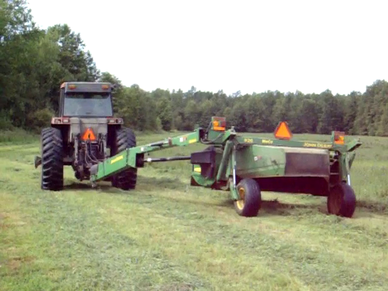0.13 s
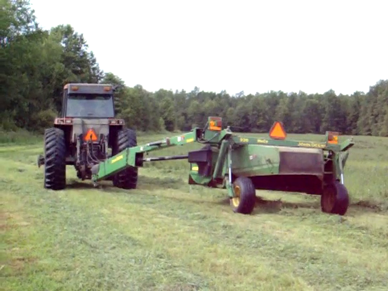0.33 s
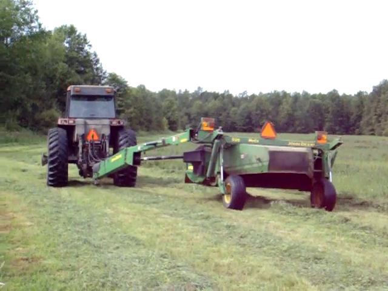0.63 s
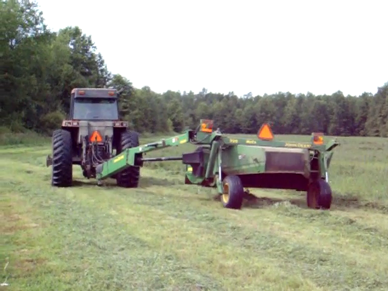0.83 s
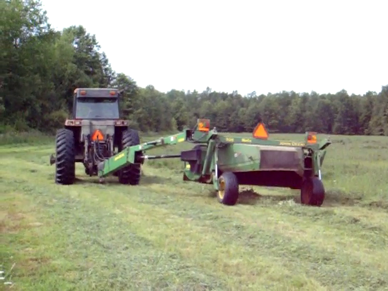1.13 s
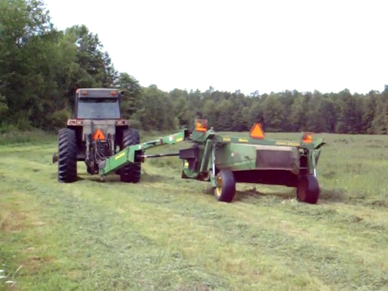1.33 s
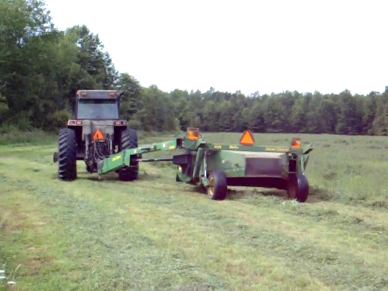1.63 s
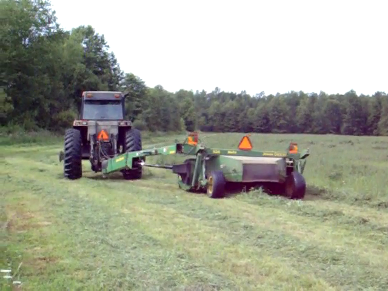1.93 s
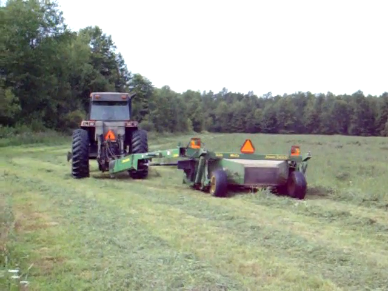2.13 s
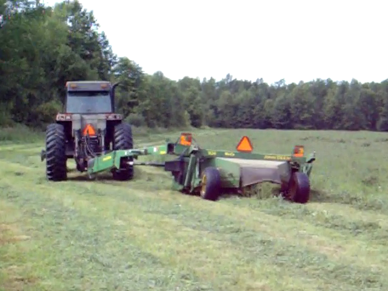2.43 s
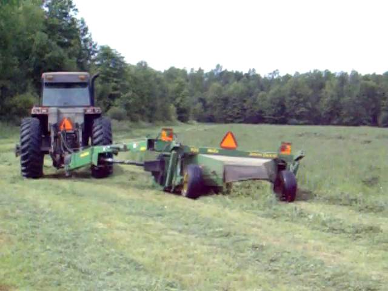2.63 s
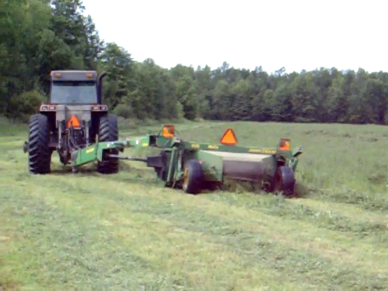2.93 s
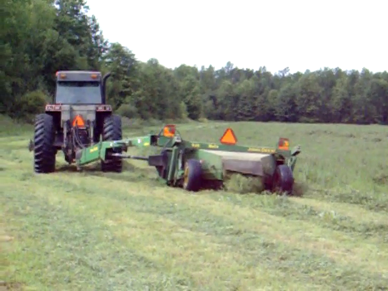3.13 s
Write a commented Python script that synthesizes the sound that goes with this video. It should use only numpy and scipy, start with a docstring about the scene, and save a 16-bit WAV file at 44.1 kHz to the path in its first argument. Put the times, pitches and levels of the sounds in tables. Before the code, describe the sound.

A tractor runs with a steady drone, towing a mower that rattles and hisses through hay.

```python
"""A steady exhaust drone under a rattling roar: a tractor tows a disc mower away through a hay field.
Periodic firing gives the drone its harmonics, and the gears whine at multiples of the same rate.
Random impacts in the mower roar and ring its hood while the blades hiss, surging on clumps of hay.
The spectrum shifts as the rig bends away. Wind puffs on the microphone, and late on a dull thud
leads into one sharp knock that makes the gain control duck."""
import sys
import numpy as np
from scipy.fft import rfft, irfft, next_fast_len
from scipy.io import wavfile
from scipy.ndimage import uniform_filter1d, minimum_filter1d, map_coordinates

SR = 44100
rng = np.random.default_rng(int(sys.argv[2]) if len(sys.argv) > 2 else 0)


def generate_wav(sig):
    """Save sig (samples, or channels by samples) to the path in sys.argv[1] as 16-bit PCM at SR."""
    pcm = np.round(np.clip(np.atleast_2d(sig).T, -1, 1) * 32767).astype(np.int16)
    wavfile.write(sys.argv[1], SR, pcm)


N = 144648
T = np.arange(N) / SR


def amp(db):
    """Amplitude ratio of a level in decibels."""
    return 10 ** (np.asarray(db) / 20)


def unit(x):
    """Normalisation to unit rms."""
    return x / np.sqrt(np.mean(x ** 2) + 1e-20)


def curves(rows):
    """Linear interpolation in time: one value per sample for each column after the first."""
    times, *columns = np.transpose(rows)
    return [np.interp(T, times, column) for column in columns]


def bump(centre_s, width_s):
    """Gaussian envelope, its full width taken at 1/e of the peak."""
    return np.exp(-(2 * (T - centre_s) / width_s) ** 2)


def wobble(rate):
    """Smooth random modulation: a spline through rate knots a second."""
    return map_coordinates(rng.standard_normal(int(N * rate / SR) + 4), [T * rate])


def noise():
    """Gaussian white noise."""
    return rng.standard_normal(N)


def filtered(x, response):
    """Linear filtering: the spectrum of x times a frequency response."""
    size = next_fast_len(N + 8192)
    return irfft(rfft(x, size) * response(np.fft.rfftfreq(size, 1 / SR)), size)[:N]


def coloured(x, spectrum):
    """Spectral shaping by (frequency [Hz], relative level [dB]) points, at unit rms."""
    freqs, db = np.transpose(spectrum)
    return unit(filtered(x, lambda hz: amp(np.interp(np.log(hz + 1), np.log(freqs), db, right=-90))))


# puffs of wind (time [s], width [s], level [dB])
WIND_PUFFS = [(0.186, 0.035, -25.5), (0.697, .06, -25), (1.254, 0.027, -28.5), (2.273, .04, -23),
              (2.514, .05, -21.5), (2.589, .05, -17), (2.719, .08, -22)]
# wind noise (frequency [Hz], relative level [dB])
WIND_SPECTRUM = [(15, -18.5), (45, -5), (85, -0.5), (160, -6), (350, -9.5), (900, -36.5)]


def wind():
    """Turbulent pressure on the microphone gives short puffs of low-frequency noise."""
    envelope = sum(amp(db) * bump(time, width) for time, width, db in WIND_PUFFS)
    return envelope * coloured(noise(), WIND_SPECTRUM)


# the dull thud and the hard knock (frequency [Hz], relative level [dB])
THUD_SPECTRUM = [(70, -12), (150, -8), (220, 0), (290, -2), (340, -16), (700, -40)]
KNOCK_SPECTRUM = [(30, 0), (150, 3), (600, 0), (1500, 0), (2600, -6), (4000, -12), (5500, -28), (7000, -55)]


def knock(onset_s=2.749, rise_s=.0007, t60_s=.011, level_db=9):
    """A low thud swells, then a heavily damped transient: broadband noise with an exponential decay."""
    thud = amp(-16) * bump(centre_s=2.727, width_s=.055) * coloured(noise(), THUD_SPECTRUM)
    age = np.maximum(T - onset_s, 0)
    rise = 1 - np.exp(-age / rise_s)
    decay = amp(level_db - 60 * age / t60_s)
    return thud + rise * decay * coloured(noise(), KNOCK_SPECTRUM)


# engine and gear tones (multiple of firing rate [-], level before bend [dB], level after bend [dB])
SHAFT_ORDERS = [(1.27, -32.5, -33), (2.5, -47.5, -32.5), (3.998, -39, -29.5), (5, -28.5, -34.5),
                (6, -41, -56), (6.99, -35, -34.5), (7.36, -42, -43), (7.98, -36, -31), (8.93, -39, -37.5),
                (9.99, -33, -34), (11.07, -39, -46), (11.99, -33.5, -48), (12.52, -28, -38.5),
                (13.07, -37.5, -46.5), (15.08, -40.5, -42), (17.55, -47, -33), (20.01, -31.5, -48.5),
                (20.94, -43.5, -36.5), (22.12, -36.5, -59.5), (29.7, -47, -48.5), (30.92, -42.5, -37.5),
                (39.6, -43.5, -47.5), (43.5, -36.5, -37)]


def driveline(phase, bend, waver_db=1.5, jitter_rad=0.27):
    """Rotational orders: engine harmonics and gear whine track the shaft, wavering in level and phase."""
    tones = np.zeros(N)
    for order, before_db, after_db in SHAFT_ORDERS:
        db = before_db + bend * (after_db - before_db) + waver_db * wobble(12)
        angle = order * phase + jitter_rad * wobble(30) + rng.uniform(0, 2 * np.pi)
        tones += np.sqrt(2) * amp(db) * np.sin(angle)
    return tones


def clatter(rate, share):
    """Shot noise: rate random impacts a second carry a share of the power, rushing air the rest."""
    impacts = unit((rng.random(N) < rate / SR) * noise())
    return np.sqrt(share) * impacts + np.sqrt(1 - share) * noise()


def bending(x, before, after, bend):
    """Directivity as a crossfade: x passes from one spectrum to another as the rig bends away."""
    return unit((1 - bend) * coloured(x, before) + bend * coloured(x, after))


# disc roar and hood resonance either side of the bend; blade hiss (frequency [Hz], relative level [dB])
ROAR_SPECTRUM_BEFORE = [(400, -46.5), (560, -20.5), (660, -9.5), (850, -3.5), (1040, -3), (1120, 0.5),
                        (1200, -5), (1420, -11), (1800, -35.5)]
ROAR_SPECTRUM_AFTER = [(400, -48.5), (530, -11.5), (680, -4), (850, -3.5), (990, -3.5), (1120, 2),
                       (1230, -5), (1400, -8.5), (1800, -26.5)]
HOOD_SPECTRUM_BEFORE = [(1100, -25), (1450, -4.5), (1550, 0.5), (1660, 1.5), (1780, 0), (1930, -6.5),
                        (2100, -23.5), (2700, -38)]
HOOD_SPECTRUM_AFTER = [(1100, -36.5), (1460, -10.5), (1540, 3), (1620, -1), (1740, -5.5), (1880, -10.5),
                       (2050, -19), (2700, -42)]
HISS_SPECTRUM = [(1500, -23.5), (2100, -4), (2400, -1), (2720, 1.5), (2950, -1.5), (3250, 3), (3650, -0.5),
                 (3880, 1), (4250, -5.5), (5000, -11.5), (5800, -17), (6400, -38), (7000, -62)]
# relative levels of the mower's three bands (time [s], roar [dB], hood [dB], hiss [dB])
MOWER_LEVELS = [(0, -17.5, -26, -23), (0.25, -19, -24.5, -20.5), (0.55, -17.5, -19.5, -21),
                (0.85, -21, -25, -22.0), (1.1, -17.6, -22.6, -22), (1.35, -19.5, -24, -22),
                (1.55, -17, -22, -20.5), (1.85, -20.5, -26, -21.4), (2.15, -21.5, -26, -19.5),
                (2.4, -20.5, -28, -23), (2.65, -19.5, -24.0, -21), (2.95, -19.5, -21, -22),
                (3.15, -23, -27, -24.5), (3.28, -21, -20.5, -21.5)]
# surges as clumps of hay pass through (time [s], roar gain [dB], hood gain [dB], hiss gain [dB])
HAY_CLUMPS = [(0.566, 3, 1, 4), (0.671, 1.5, -1, 0.5), (.97, 2, 5, 3.5), (1.04, 2.5, 3, 0),
              (1.18, 2, 1, 0.5), (1.27, 1.5, 1.5, 3.5), (1.51, 4, 5.5, 2), (1.645, 1.5, 0.5, 2),
              (1.699, 1.5, 0, 0), (1.871, 1.5, 3, 1.5), (2.03, 3.5, 8, 0.5), (2.14, 3.5, -3, 0),
              (2.275, 0, 6.5, 2), (2.54, 5, 0.5, 3), (2.595, 0, 7, -2), (2.91, -1.5, 0, 3), (3.04, 3, 4, 0)]


def mower(phase, bend, roar_trim_db=-0.5, hood_trim_db=-1.5, hiss_trim_db=-0.5):
    """Impact excitation: discs and rollers roar and ring the hood; blades hiss through stalks in pulses."""
    roar = bending(clatter(rate=1200, share=0.45), ROAR_SPECTRUM_BEFORE, ROAR_SPECTRUM_AFTER, bend)
    hood = bending(clatter(rate=600, share=0.21), HOOD_SPECTRUM_BEFORE, HOOD_SPECTRUM_AFTER, bend)
    blade_pulses = amp(1.0 * np.cos(2 * phase) + 0.63 * np.cos(phase * 3 / 4))
    hiss = coloured(clatter(rate=5000, share=.25) * blade_pulses, HISS_SPECTRUM)
    surge_db = sum(np.outer(gains, bump(time, width_s=0.045)) for time, *gains in HAY_CLUMPS)
    lull_db = -1.5 * bump(centre_s=3.13, width_s=.07)  # the mower briefly runs light
    roar_db, hood_db, hiss_db = curves(MOWER_LEVELS) + surge_db + lull_db + 0.62 * wobble(24)
    return (roar * amp(roar_db + roar_trim_db)
            + hood * amp(hood_db + hood_trim_db)
            + hiss * amp(hiss_db + hiss_trim_db))


# levels of the lowest exhaust harmonics (time [s], first [dB], second [dB], third [dB])
EXHAUST_HARMONICS = [(0, -20.3, -25, -12.3), (0.12, -20, -18, -10), (0.35, -17, -17, -10),
                     (0.48, -18.5, -21.5, -11.5), (0.7, -19.5, -19.5, -12), (0.85, -23, -18, -12),
                     (1.2, -22, -19.5, -12.0), (1.55, -19.5, -18, -10), (1.8, -18.5, -21.5, -10),
                     (1.95, -18, -28.4, -13), (2.08, -16.5, -23, -13.5), (2.22, -15, -30, -12),
                     (2.4, -19, -23, -9), (2.58, -18, -29.5, -11.5), (2.7, -22, -42, -11.5),
                     (2.95, -18, -16, -11), (3.12, -21, -21, -11), (3.28, -19.5, -26.5, -10)]
# exhaust rumble (frequency [Hz], relative level [dB])
RUMBLE_SPECTRUM = [(20, -12), (55, -8.5), (100, -4.5), (150, -2.5), (250, -0.5), (330, -3), (430, -9),
                   (520, -15), (800, -39.5)]


def exhaust(phase, waver_db=0.43, throb_db=1.5, rumble_db=-25):
    """Periodic firing radiates a harmonic series and modulates the amplitude of a low rumble."""
    drone = np.zeros(N)
    for harmonic, db in enumerate(curves(EXHAUST_HARMONICS), start=1):
        amplitude = np.sqrt(2) * amp(db + waver_db * wobble(25))
        drone += amplitude * np.sin(harmonic * phase + rng.uniform(0, 2 * np.pi))
    throb = amp(throb_db * np.cos(phase))
    return drone + amp(rumble_db) * coloured(noise() * throb, RUMBLE_SPECTRUM)


# engine speed (time [s], firing rate [Hz])
FIRING_RATE = [(0, 88.67), (.22, 88.06), (.4, 87.4), (.63, 89.32), (.88, 88.2), (1, 88.2), (1.1, 88.5),
               (1.4, 87.73), (1.7, 88.05), (2, 87.8), (2.4, 87.14), (2.92, 87.38), (3.12, 87.07),
               (3.28, 86.84)]


def scene(mid_bend_s=2.03, bend_length_s=0.41):
    """Superposition: tractor and mower, phase-locked by one shaft, add to the wind and the knock."""
    phase = 2 * np.pi * np.cumsum(curves(FIRING_RATE)[0]) / SR
    bend = np.clip((T - mid_bend_s) / bend_length_s + .5, 0, 1)  # 0 before the bend, 1 after
    rig = exhaust(phase) + driveline(phase, bend) + mower(phase, bend)
    return (rig + wind() + knock())[None]


def gain_control(x, threshold=1.2, attack_s=.001, hold_s=.015, release_db_per_s=85):
    """Peak limiting: the gain drops on a peak above the threshold, holds, then climbs back."""
    excess_db = 20 * np.log10(np.maximum(np.abs(x) / threshold, 1))
    hold = int(hold_s * SR)
    held_db = -minimum_filter1d(-excess_db, hold, origin=(hold - 1) // 2)  # trailing maximum
    release_db = release_db_per_s * T
    cut_db = np.maximum.accumulate(held_db + release_db) - release_db
    return x * uniform_filter1d(amp(-cut_db), int(attack_s * SR))


def record(dry):
    """Saturation rounds off the peaks left by the gain control; a low-pass limits the bandwidth."""
    ceiling, hardness, cutoff_hz = .96, 12, 6891
    limited = gain_control(dry[0])
    clipped = limited / (1 + np.abs(limited / ceiling) ** hardness) ** (1 / hardness)
    return filtered(clipped, lambda hz: hz < cutoff_hz)[None]


dry = scene()
out = record(dry)
generate_wav(out)
```